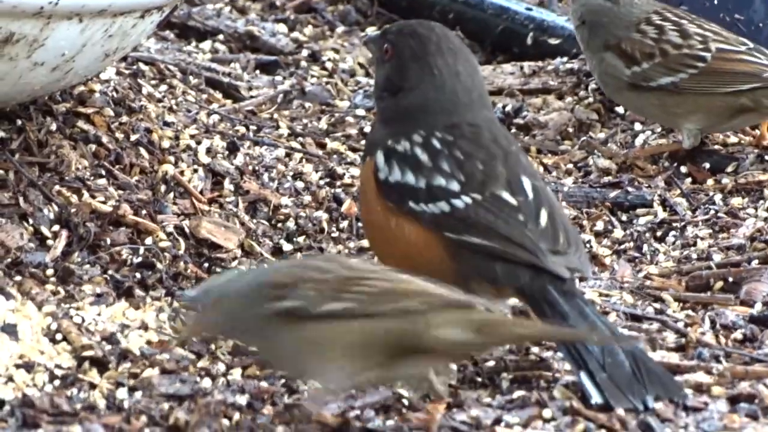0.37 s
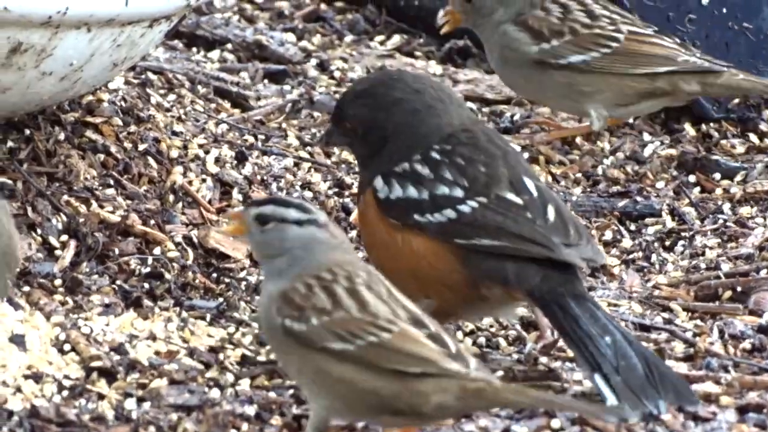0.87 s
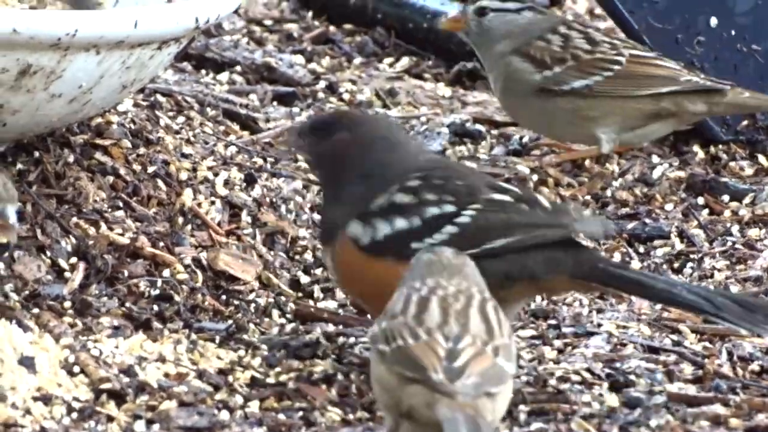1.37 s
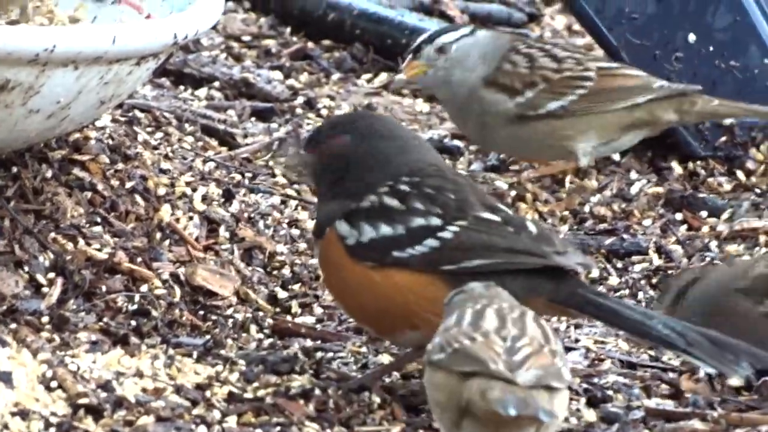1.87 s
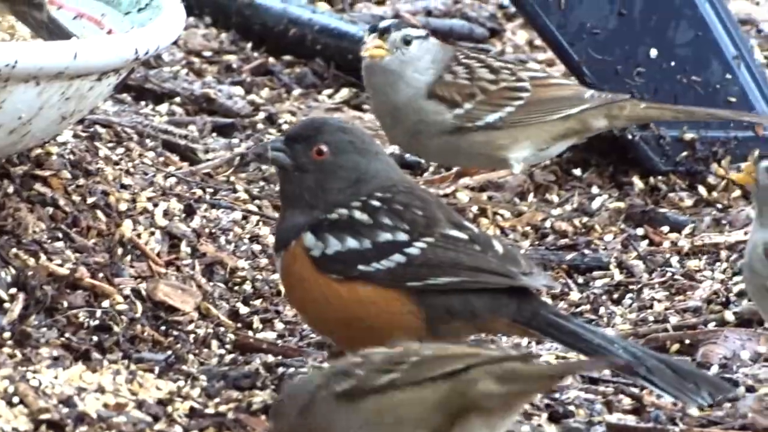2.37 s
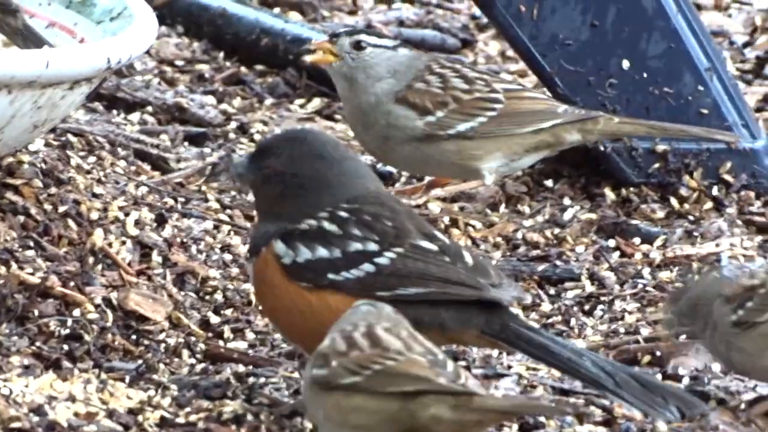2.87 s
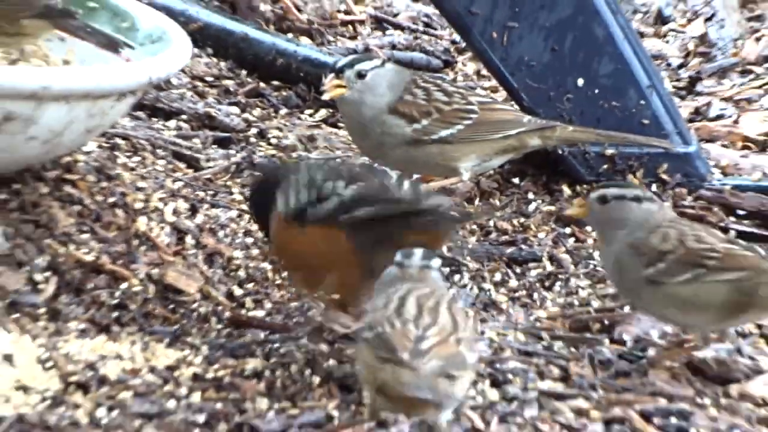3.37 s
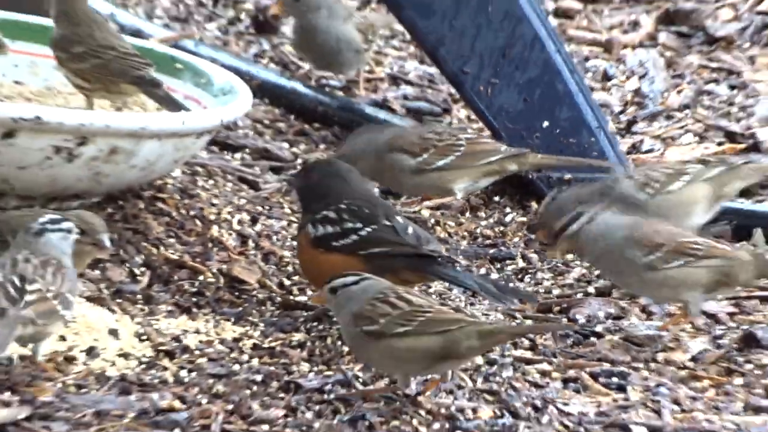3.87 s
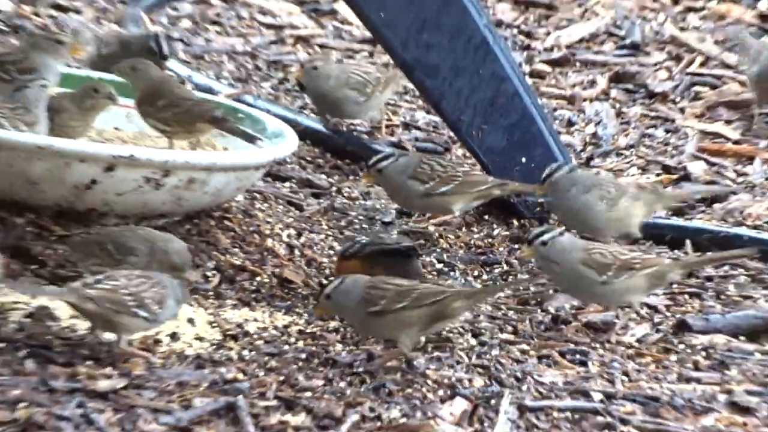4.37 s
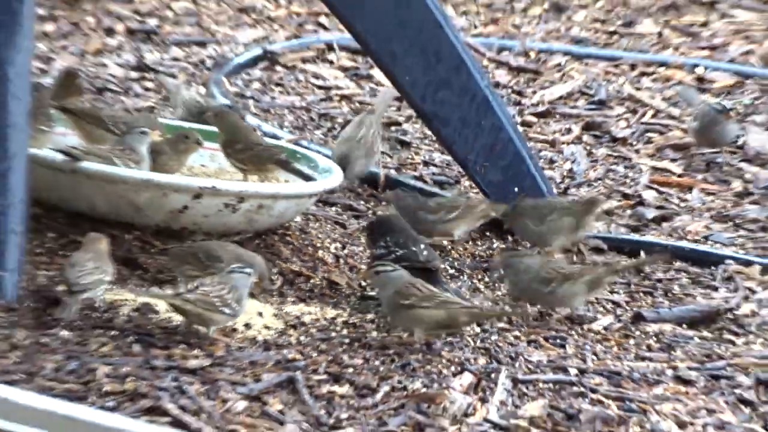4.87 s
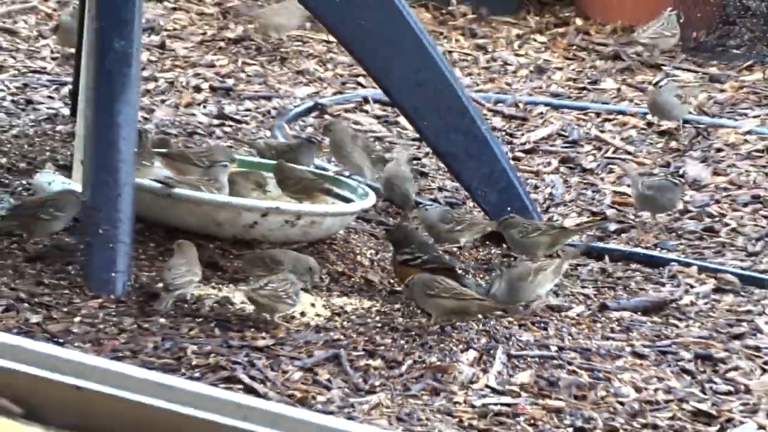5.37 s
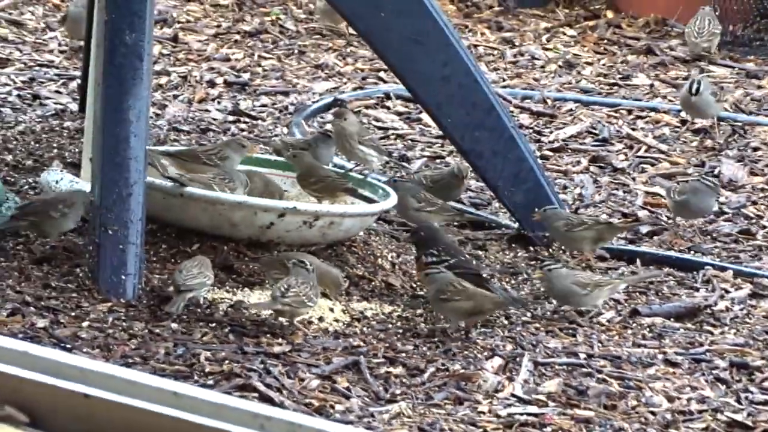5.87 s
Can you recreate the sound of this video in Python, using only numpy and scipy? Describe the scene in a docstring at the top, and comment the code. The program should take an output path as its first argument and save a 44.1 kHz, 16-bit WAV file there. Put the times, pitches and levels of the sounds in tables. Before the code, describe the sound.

A busy flock of sparrows chips sharply and twitters close by, one squabbling nasally, with seeds ticking on the ground outdoors.

```python
"""Sparrows feed on the ground in a garden, close by: many give short chips, each made of two whistles at once.
One bird squabbles in nasal notes that arch upward, built from a base tone and two overtones shaped by a throat.
Seeds and twigs tick under beaks and feet, made from short bursts of noise.
Softer birds call further off, and scattered echoes follow all the birds and ticks.
Behind lie an outdoor wash of shaped noise, a faint hum of sines, and a far drone of narrow noise."""
import sys
import numpy as np
from scipy import signal
from scipy.io import wavfile
from scipy.ndimage import uniform_filter1d

SR = 44100
rng = np.random.default_rng(int(sys.argv[2]) if len(sys.argv) > 2 else 0)


def transcribe(signal):
    """Save signal, clipped to [-1, 1], as a 16-bit WAV file at the path in sys.argv[1]."""
    frames = np.atleast_2d(signal).T
    limited = np.clip(frames, -1, 1)
    pcm = np.round(limited * 32767).astype(np.int16)
    wavfile.write(sys.argv[1], SR, pcm)


def level_to_linear(level):
    """Convert decibel levels to linear amplitude factors, elementwise."""
    exponent = np.asarray(level, float) / 20
    return 10 ** exponent


N = 265041  # length of the scene in samples


def evened(x):
    """Scales a sound to an rms of one."""
    return x / np.sqrt(np.mean(x ** 2) + 1e-20)


def read(points, hz):
    """Reads a curve between its points, along a log-frequency axis."""
    f, value = np.transpose(points)
    return np.interp(np.log(hz + 1), np.log(f + 1), value)


def add(mix, s, sound):
    """Mixes a sound in at time s, cutting off what runs past the end."""
    part = mix[round(s * SR):][:len(sound)]
    part += sound[:len(part)]


def wobble(t, span_s):
    """Random drift: a new chance value every span_s, joined by straight lines."""
    knots = rng.standard_normal(200)
    return np.interp(t / span_s, np.arange(len(knots)), knots)


def band(x, lo_hz, hi_hz):
    """Keeps mainly the sound between two frequencies."""
    return signal.sosfilt(signal.butter(2, [lo_hz, hi_hz], "bandpass", fs=SR, output="sos"), x)


# tone color of the outdoor wash: (f/Hz, relative level/dB)
WASH_COLOR = [(30, -12), (150, -12.5), (450, -10.5), (1500, -20), (4500, -21.5), (7000, -25),
              (11000, -30.5)]
# how alike left and right are: (f/Hz, likeness)
LIKENESS = [(100, 0.95), (570, 0.32), (1500, 0.55), (6000, 0.64)]
# rise and fall of the distant flock's share of the wash: (t/s, relative level/dB)
BUSTLE = [(0, 4), (.55, 0), (1.2, 4.5), (3, 6), (4.9, -6.5), (5.3, -0.5), (5.75, -8), (6, -2.5)]
# where in the wash that share lies: (f/Hz, share 0-1)
BUSTLE_SHARE = [(900, 0), (2000, 1)]


def wash():
    """Outdoor noise from random short-time spectra with drifting patches, louder left in the low middle."""
    frames, hz = N // 256 + 5, np.fft.rfftfreq(1024, 1 / SR)
    a, b, c, d, patches = rng.standard_normal((frames, 513, 5)).T
    # smooth over neighboring pitches, then over time
    patches = uniform_filter1d(patches, size=14, axis=0)
    patches = evened(uniform_filter1d(patches, size=24, axis=1))
    same = np.clip(read(LIKENESS, hz), -1, 1)[:, None]
    left = a + 1j * b
    shared = same * left * np.exp(-.8j * (1 - same))
    right = shared + np.sqrt(1 - same ** 2) * (c + 1j * d)
    # the less alike the sides, the softer the right
    spectra = np.array([left, right * level_to_linear(-7.0 * (1 - same))])
    bustle_db = np.interp(np.arange(frames) * 256 / SR, *np.transpose(BUSTLE))
    flock_db = read(BUSTLE_SHARE, hz)[:, None] * (bustle_db + 3.0 * patches)
    spectra *= level_to_linear(read(WASH_COLOR, hz)[:, None] + 1.2 * patches + flock_db)
    noise = signal.istft(spectra, nperseg=1024, noverlap=768)[1][:, :N]
    return level_to_linear(-52.5) * evened(noise)


# steady low lines: (f/Hz, level/dB)
HUM = [(59, -66.5), (120, -67.5), (490, -73.5)]


def hum():
    """Low sine lines whose loudness wavers a little."""
    t = np.arange(N) / SR
    return sum(level_to_linear(db + 1.0 * wobble(t, 0.082)) * np.sqrt(2) * np.sin(2 * np.pi * hz * t) for hz, db in HUM)


def chip(s, length, db, held_hz, start_hz, second_hz):
    """Both sides of the syrinx (voice organ) whistle; pitch slides fast up to held_hz or sags through it."""
    t = np.arange(-.012, length, 1 / SR)  # a faint, steep lead-in comes before s
    if start_hz < 0:
        slide_hz = start_hz * np.exp(-t / 0.009)
    else:
        slide_hz = start_hz * (1 - t / 0.053)
    slide_hz = slide_hz - max(-.6 * start_hz, 300) * np.exp(-t / 0.0052)
    hz = held_hz + slide_hz + 55 * wobble(t, .0015) + 70 * wobble(t, .02)
    main = 2 * np.pi * np.cumsum(hz) / SR
    gap = 2 * np.pi * np.cumsum(second_hz + 90 * wobble(t, 0.0032)) / SR
    voice = level_to_linear(4.9 * wobble(t, 0.0027)) * np.sin(main)
    voice += level_to_linear(-5 + 4.0 * wobble(t, .005)) * np.sin(main + gap)
    # the two sides couple and leave weaker lines at the same spacing on either side
    voice += level_to_linear(-17 + 4.0 * wobble(t, .006)) * (np.sin(main - gap) + np.sin(main + 2 * gap))
    voice += level_to_linear(-14.5) * band(rng.standard_normal(len(t)), 2600, 13900)  # air rushing past
    voice += level_to_linear(-12 - 400 * abs(t)) * np.sin(2 * main)  # the overtone flashes as the note breaks out
    # silent while the sliding pitch is still below 2300 Hz
    onset = (.14 + np.clip(t / .015, 0, 1)) * (held_hz + slide_hz > 2300)
    progress = (t - t[0]) / (length - t[0])
    swell = onset * abs(np.sin(np.pi * progress ** 0.5))
    return max(s + t[0], 0), level_to_linear(db) * np.sqrt(2) * voice * swell


# chips that scoop up: (t/s, length/s, level/dB, held f/Hz, second voice above or below it f/Hz)
CHIPS = [(0.025, 0.059, -36.5, 6130, -760), (0.246, 0.12, -35, 5690, 842), (0.436, 0.063, -38.5, 5746, 567),
         (0.563, 0.14, -48.5, 6500, -660), (0.593, 0.051, -36.5, 5760, 553),
         (0.63, 0.062, -35.5, 5510, 591), (0.696, 0.13, -41, 6880, 636), (1.134, 0.12, -43.5, 6490, 570),
         (1.227, 0.083, -36, 5453, 651), (1.291, 0.12, -41, 7080, 601), (1.581, 0.041, -36, 6900, -660),
         (1.607, 0.044, -32.5, 5100, 531), (1.903, 0.067, -42, 6620, 580), (2.369, 0.039, -36.5, 5220, 611),
         (2.404, 0.056, -34.5, 4086, 730), (2.59, 0.047, -48, 5560, 605), (2.753, 0.06, -31.5, 5963, 576),
         (2.853, 0.035, -45.5, 5700, 582), (2.967, 0.059, -38, 6030, -660),
         (3.093, 0.082, -37.5, 6060, 728), (3.161, 0.038, -41.5, 5900, -560),
         (3.219, 0.046, -42.5, 6000, -500), (3.503, 0.088, -37, 6630, 721.5),
         (3.61, 0.044, -49.5, 5230, 603), (3.743, 0.063, -42, 6350, 429), (4.172, 0.048, -31.5, 6290, 689),
         (4.259, 0.069, -45.5, 6830, -520), (4.373, 0.077, -42, 6160, 588), (4.661, 0.042, -39, 6620, 668),
         (4.75, 0.052, -40.5, 6560, 448), (4.469, 0.044, -51.5, 6060, -600),
         (4.857, 0.046, -44.5, 6050, 640), (5.22, 0.032, -56, 4680, -420), (5.457, 0.14, -42.5, 6790, 673),
         (5.729, 0.22, -53.5, 6350, 586), (5.823, 0.068, -40, 6110, 702)]


def scooping_chips():
    """Near chips scoop up into their note; the lower a chip, the deeper its scoop, but never under a set depth."""
    out = np.zeros(N)
    for s, length, db, hz, second_hz in CHIPS:
        scoop_hz = 0.3 * max(8800 - hz, 1200)
        add(out, *chip(s, length, db, hz, -scoop_hz, second_hz))
    return out


def garden(x):
    """Walls and ground scatter the sounds: sparse taps of random sign, dying away."""
    at = np.arange(80, SR // 2, 20)
    at = at + rng.integers(0, 20, (3, len(at)))
    taps = np.zeros((3, SR // 2 + 40))
    np.put_along_axis(taps, at, rng.choice([-1., 1.], at.shape), 1)
    t = np.arange(taps.shape[1]) / SR
    taps *= level_to_linear(-60 * t / .12) + level_to_linear(-14 - 60 * t / .4)  # a quick fade over a fainter, slower one
    tail = taps[0] + .55 * taps[1:]  # left and right hear nearly the same echoes
    return signal.fftconvolve(x[None], tail / np.linalg.norm(tail[0]), axes=1)[:, :N]


# short bright ticks, mostly on the ground; the one at 5.127 s is a bird's steep call, short and sharp as a
# click: (t/s, relative level/dB)
TICKS = [(0.411, -35.5), (0.564, -31.5), (1.071, -32.5), (3.203, -29), (5.127, -26), (1.348, -32),
         (3.723, -27), (3.846, -37.5), (4.521, -35.5), (5.282, -34.5), (5.3085, -35.5), (5.826, -33),
         (.317, -41), (1.896, -34), (2.077, -42), (2.1, -40), (5.398, -42), (5.545, -38), (5.592, -49)]
# feet landing: (t/s, level/dB, f/Hz)
HOPS = [(0.475, -40.5, 950), (1, -47, 320), (1.638, -48, 654), (2.273, -43, 262), (2.361, -41.5, 910),
        (3.027, -44.5, 320), (3.916, -39.5, 700), (4.012, -44, 300), (4.838, -47, 830), (5.021, -50, 291),
        (5.422, -40, 1790), (5.54, -47, 710)]


def litter():
    """Ticks are bright clicks of noise, hops gritty scuffs; a fine patter of small ticks runs underneath."""
    patter_db = -53 + 4.0 * np.minimum(rng.exponential(1, N), 4)
    clicks = level_to_linear(patter_db) * (rng.random(N) < 24 / SR)  # about 24 small ticks a second
    for s, db in TICKS:
        add(clicks, s, level_to_linear([db]))
    t = np.arange(SR // 20) / SR
    snap = np.sqrt(t) * level_to_linear(-60 * t / .012)
    bursts = signal.oaconvolve(clicks, snap / snap.max())[:N]
    out = band(bursts * rng.standard_normal(N), 5500, 14000)
    for s, db, hz in HOPS:
        grit = rng.standard_normal(len(t)) * level_to_linear(5.0 * wobble(t, .002))
        puff = band(grit, hz / 1.52, hz * 1.38) * np.sqrt(t) * level_to_linear(-60 * t / 0.055)
        add(out, s, level_to_linear(db) * puff / abs(puff).max())
    return out


def far_flock():
    """Birds further off chip and squabble at random, on the whole ever more softly, and stop near the end."""
    out = np.zeros(N)
    for s, a, b, c in rng.random((70, 4)):
        add(out, *chip(5.0 * s, 0.036 + 0.0092 * a, -60 - 2.4 * s + 6 * b, 2600 + 3500 * c, -1500 * a, 599.4))
        add(out, *squabble_note(.1 + 5.0 * b, -72 - 4.0 * b, 2100 + 1100 * a, .07))
    return out


# tone color of the squabbling throat: (f/Hz, relative level/dB)
THROAT = [(1500, -20), (2000, 1.5), (3300, 4.5), (3900, 3.5), (4600, 0), (7000, 5.5), (11000, 12)]


def squabble_note(s, db, top_hz, climb_s):
    """A raspy, nasal note creeps up, humps quickly to its top at s, drops back, and passes the throat."""
    t = np.arange(0, climb_s + 0.046, 1 / SR)
    rising = t < climb_s
    hump = np.exp(-abs((t - climb_s) / np.where(rising, .026, .018)) ** 2.196)
    arch = np.where(rising, .3 * (t / climb_s) ** 2 + .7 * hump, hump)
    hz = (1900 + (top_hz - 1900) * arch) * (1 + .024 * wobble(t, .0015) + .02 * wobble(t, .015))
    turn = 2 * np.pi * np.cumsum(hz) / SR
    voice = np.zeros(len(t))
    for k, over_db in enumerate([5, 6, -5], start=1):  # the base tone and two overtones
        voice += level_to_linear(read(THROAT, k * hz) + over_db + 4.0 * wobble(t, .007)) * np.sin(k * turn)
    # breath, strongest in the throat's main resonance
    breath = rng.standard_normal(len(t))
    voice += level_to_linear(12) * band(breath, 3400, 4300) + level_to_linear(6) * band(breath, 2200, 11000)
    # an uneven flutter
    rasp = 1 + .45 * np.sin(2 * np.pi * np.cumsum(450 + 150 * wobble(t, .008)) / SR)
    fade = level_to_linear(-150 * np.maximum(t - climb_s, 0)) * signal.windows.tukey(len(t), .3)
    return s - climb_s, level_to_linear(db) * voice * rasp * fade


# thin calls that sag: (t/s, length/s, level/dB, held f/Hz, second voice above or below it f/Hz)
THIN_CALLS = [(0.129, 0.086, -38.5, 7170, 556), (0.895, 0.055, -43.5, 5920, 531),
              (0.98, 0.061, -36, 6910, -640), (1.075, 0.11, -39, 6470, 516), (1.214, 0.094, -38, 7160, 467),
              (1.419, 0.32, -53, 6790, 484), (1.565, 0.13, -44, 7730, -720), (2.067, 0.035, -41, 5660, 532),
              (2.336, 0.18, -45.5, 6840, 600), (2.451, 0.088, -36.5, 7140, 514),
              (2.651, 0.064, -40, 7670, -640), (2.69, 0.043, -30.5, 6770, 524),
              (2.697, 0.06, -40, 5950, 563), (2.861, 0.11, -46.5, 7200, -440),
              (2.982, 0.097, -37.5, 7440, -500), (3.337, 0.091, -48.5, 6650, 757),
              (3.393, 0.065, -43, 6790, 913), (3.468, 0.059, -40.5, 7750, -580),
              (3.77, 0.19, -42, 7440, 497.5), (3.819, 0.17, -43.5, 6780, 790),
              (3.869, 0.21, -44.5, 7440, 498), (4.04, 0.12, -38, 7220, 544),
              (4.134, 0.093, -42.5, 6980, 574), (4.441, 0.057, -43.5, 7160, -760),
              (4.559, 0.1, -43, 7280, 504), (4.589, 0.097, -44, 6980, 543), (4.805, 0.08, -34, 6980, -480),
              (4.949, 0.12, -38.5, 7170, 545), (5.531, 0.12, -42.5, 6800, -580)]


def thin_calls():
    """High two-voiced calls that, after a quick lead-in, sag slowly through their held pitch."""
    out = np.zeros(N)
    for s, length, db, hz, second_hz in THIN_CALLS:
        add(out, *chip(s, length, db, hz, 227, second_hz))
    return out


# notes of the squabbling bird: (t/s of the top, relative level/dB, top f/Hz, climb/s)
SQUABBLE = [(0.611, -57.5, 2780, 0.054), (0.788, -60.5, 3990, 0.1), (.975, -53, 3530, 0.084),
            (1.154, -58, 2700, 0.065), (1.241, -53.5, 3230, 0.056), (1.435, -56, 3926, .085),
            (1.724, -61.5, 2900, 0.1), (1.865, -54.5, 2995, 0.094), (2.038, -53.5, 3030, 0.079),
            (2.237, -52.5, 3630, 0.082), (2.831, -60.5, 3035, 0.12), (3.029, -57, 2020, 0.099),
            (3.114, -58.5, 3720, 0.059), (3.351, -60, 4030, 0.12), (3.55, -56.5, 4030, 0.083),
            (3.754, -58.5, 3290, 0.091), (3.961, -56.5, 3800, .1), (4.171, -56.5, 3845, 0.096),
            (4.4, -58.5, 3840, 0.1), (4.589, -62, 2316, 0.088), (4.747, -59.5, 2410, 0.05),
            (4.934, -62.5, 3280, 0.061), (5.16, -61.5, 2700, 0.1), (5.435, -65.5, 3930, 0.08)]


def squabbler():
    """One near bird squabbles, note after note."""
    out = np.zeros(N)
    for row in SQUABBLE:
        add(out, *squabble_note(*row))
    return out


def drone():
    """A faint far drone: narrow noise just under 870 Hz, in one slow swell around 3.1 s."""
    swell = np.exp(-((np.arange(N) / SR - 3.1) / .6) ** 2)
    return level_to_linear(-65) * swell * evened(band(rng.standard_normal(N), 870 / 1.09, 870 * 1.013))


def scene():
    """Birds and litter, a touch louder on the left, with their echoes and the background."""
    near = scooping_chips() + litter() + far_flock() + thin_calls() + squabbler()
    direct = near * level_to_linear([[.4], [-.4]])
    return direct + level_to_linear(-4) * garden(near) + wash() + hum() + drone()


def top_cut(x):
    """Nothing passes above the cut-off."""
    return signal.sosfilt(signal.butter(12, 12240, fs=SR, output="sos"), x)


def record(dry):
    """The camera's band limit: a steep filter takes away what lies above about 11.1 kHz."""
    limited = signal.oaconvolve(dry, signal.firwin(511, 11100, fs=SR)[None], "same")
    return top_cut(limited)


dry = scene()
out = record(dry)
transcribe(out)
```